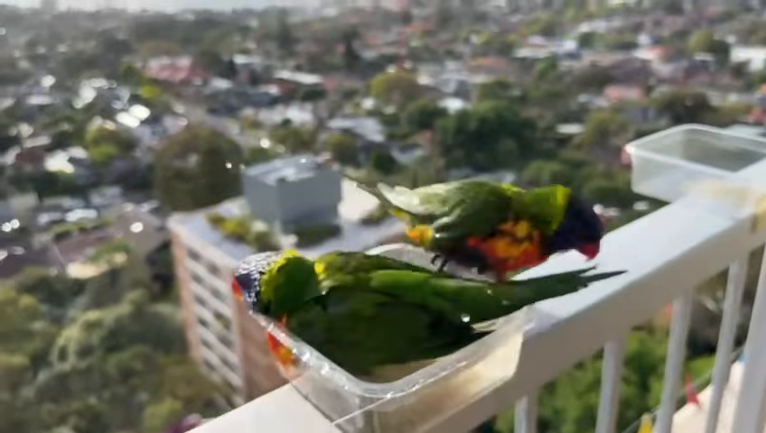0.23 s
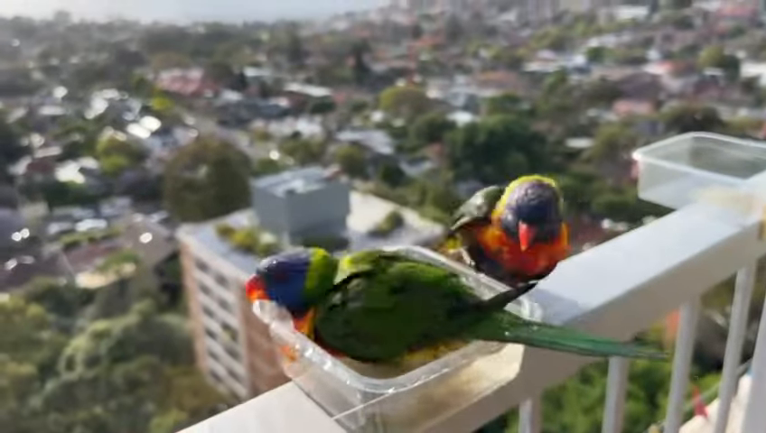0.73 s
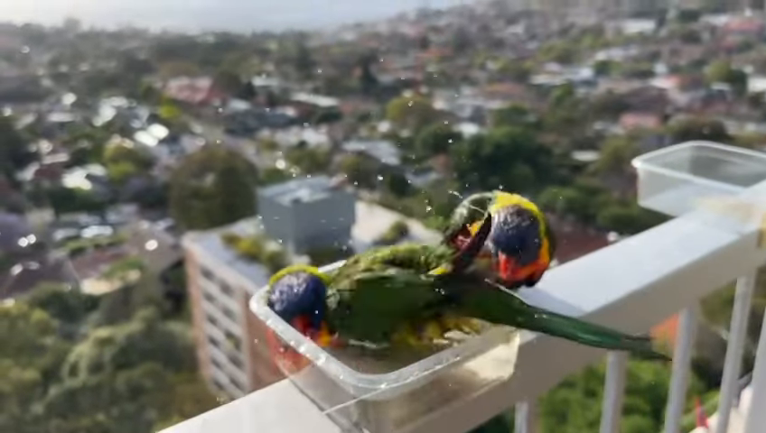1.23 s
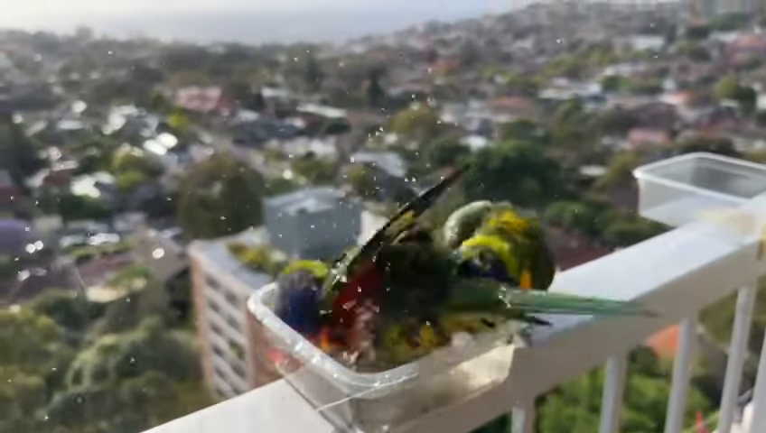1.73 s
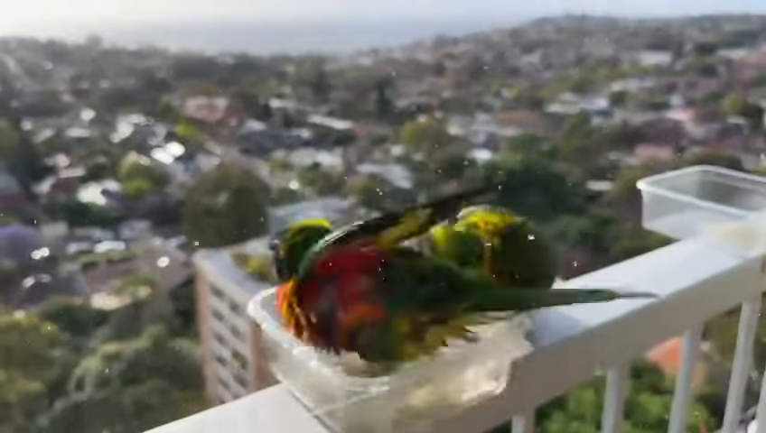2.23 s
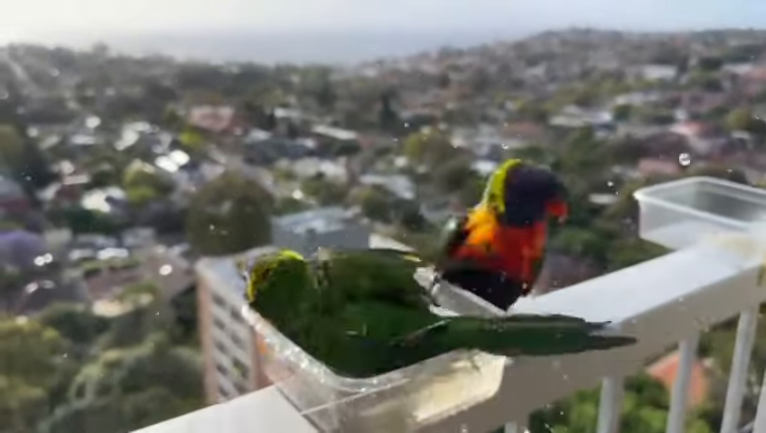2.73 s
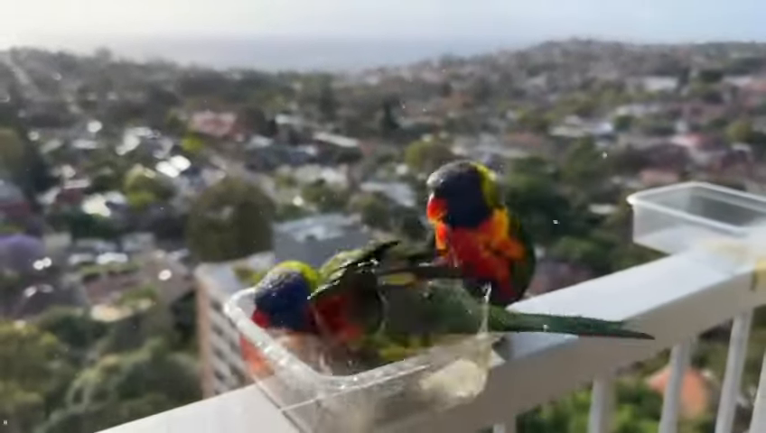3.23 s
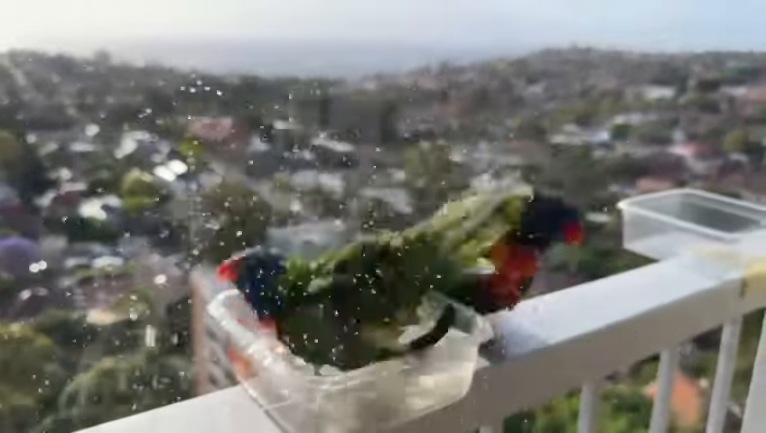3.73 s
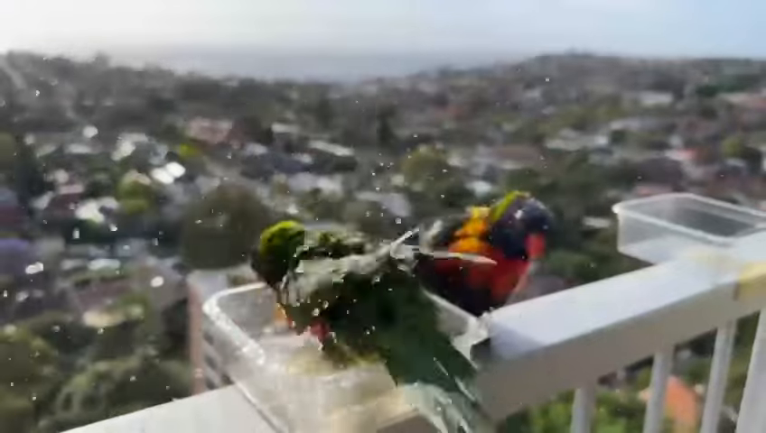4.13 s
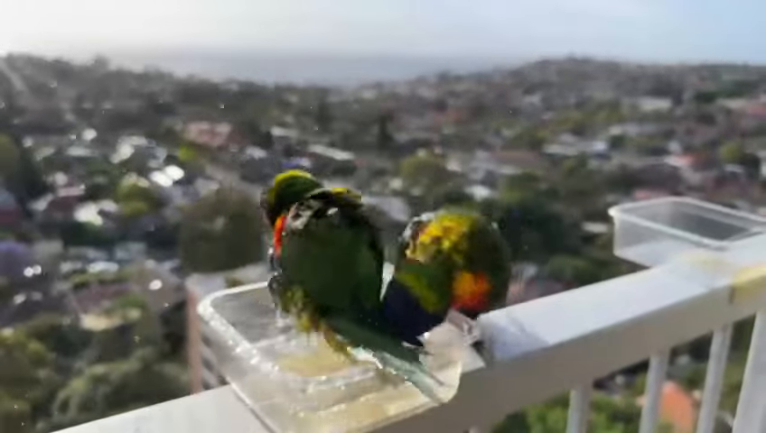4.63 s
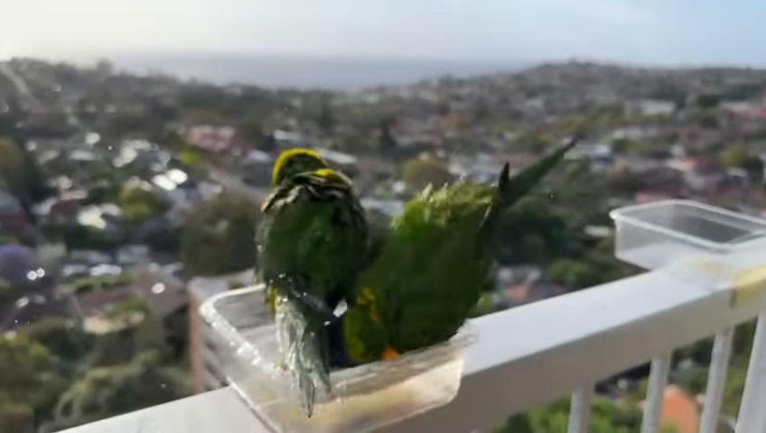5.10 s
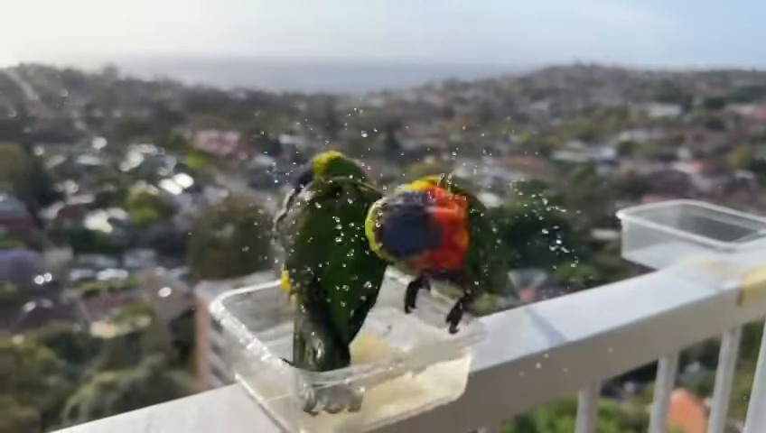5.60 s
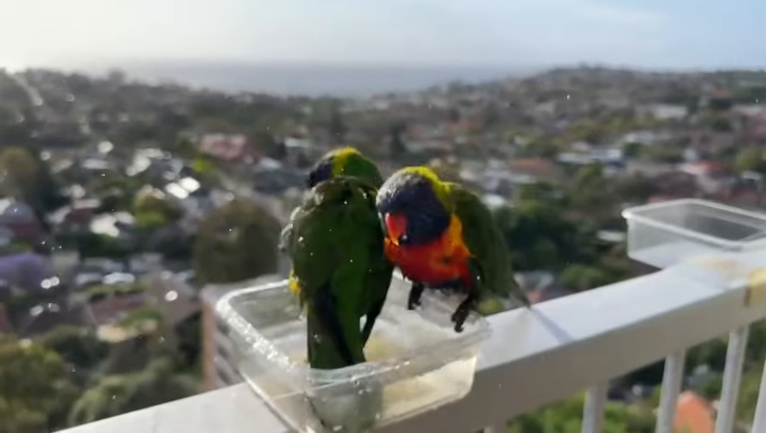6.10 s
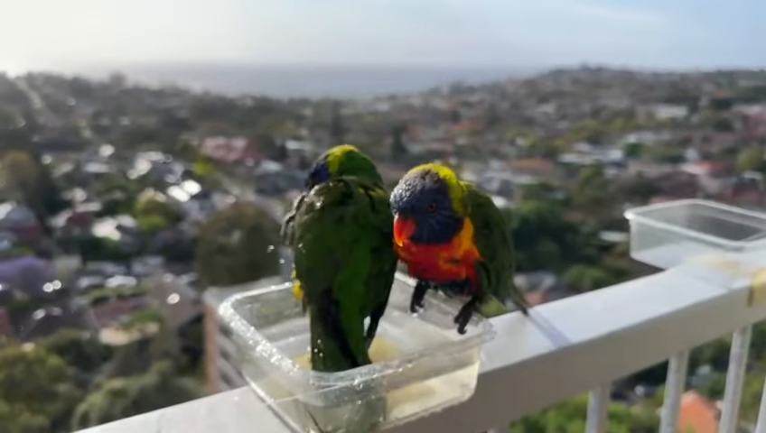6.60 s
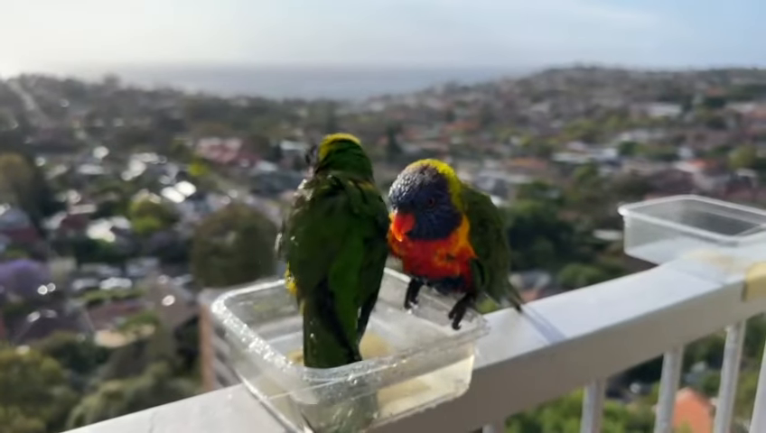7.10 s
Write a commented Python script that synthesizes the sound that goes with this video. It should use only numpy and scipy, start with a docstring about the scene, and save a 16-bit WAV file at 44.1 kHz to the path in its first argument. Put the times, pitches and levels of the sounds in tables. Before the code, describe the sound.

Shrill, raspy parrot squabbling peaks mid-scene amid crackling wet feathers, then quiets to gusty wind before one last sharp burst of calls.

```python
"""A low wavering wind drone and the hum of a town, soon cut by two lorikeets squabbling over a tub of water.
Screeches are runs of short shrill notes, built from harmonics that roughen and throb, with buzzing trills
and dry rasps of filtered puffs. Wet feathers crackle as shaped noise and claws ring the plastic tub's modes.
Gusts of filtered noise buffet a phone near the high balcony rail, which mirrors the calls; a far bird chirps."""
import sys
import numpy as np
from scipy import signal
from scipy.fft import rfft, irfft, next_fast_len
from scipy.io import wavfile

SR = 44100
rng = np.random.default_rng(int(sys.argv[2]) if len(sys.argv) > 2 else 0)


def waveform_to_disk(signal):
    """Save audio, clipped to [-1, 1], as 16-bit WAV at the path in sys.argv[1]."""
    frames = np.transpose(np.atleast_2d(signal))
    scaled = np.clip(frames, -1, 1) * 32767
    samples = np.round(scaled).astype(np.int16)
    wavfile.write(sys.argv[1], SR, samples)


N = 324135
TIME = np.arange(N) / SR


def undb(db):
    """Decibels to gain."""
    return 10 ** (np.asarray(db) / 20)


def unit(x):
    """Scale to rms 1."""
    return x / np.sqrt(np.mean(np.abs(x) ** 2) + 1e-18)


def curve(rows):
    """Join (start_s, value) rows by straight lines."""
    return np.interp(TIME, *np.transpose(rows))


def colour(hz, points):
    """Gain of a (frequency_hz, level_db) spectrum at the given frequencies."""
    point_hz, db = np.transpose(points)
    return undb(np.interp(np.log(hz + 1), np.log(point_hz), db))


def noise(points):
    """Noise with a given spectrum, rms 1."""
    white = rfft(rng.standard_normal(N))
    return unit(irfft(white * colour(np.fft.rfftfreq(N, 1 / SR), points), N))


def wander(size, hz):
    """Smooth random drift, mostly slower than hz, spread about 1."""
    span = size + SR // 10
    soft = np.exp(-(np.fft.rfftfreq(span, 1 / SR) / hz) ** 2)
    return unit(irfft(rfft(rng.standard_normal(span)) * soft, span))[:size]


def band(x, lo_hz, hi_hz, order=2):
    """Band-pass filter."""
    edges_hz = [lo_hz, min(hi_hz, SR / 2 - 1)]
    return signal.sosfilt(signal.butter(order, edges_hz, "band", fs=SR, output="sos"), x)


def spread(mid, side):
    """Left and right from mid and side."""
    return np.array([mid + side, mid - side])


def add(track, start, sound):
    """Mix a sound into a track at a time in seconds."""
    i = max(int(start * SR), 0)
    track[i:i + len(sound)] += sound[:max(N - i, 0)]


def drone():
    """Low drone of the air: one sine, unsteady in pitch and level, that fades out for good."""
    # level before its wavering: start_s, level_db
    drone_levels = [(0, -25.5), (.55, -28), (.8, -23), (1.1, -26), (1.35, -39), (1.7, -23), (2.05, -29.5),
                    (2.45, -38), (2.65, -30.5), (2.88, -45.5), (3.05, -31), (3.6, -35.5), (3.78, -42.5),
                    (4.4, -49), (4.65, -35.5), (4.9, -44)]
    # pitch before its wavering: start_s, pitch_hz
    drone_pitches = [(0, 54.7), (3.1, 54.26), (4.9, 59.2)]
    hz = curve(drone_pitches) * (1 + .06 * wander(N, 8))
    tone = unit(np.sin(2 * np.pi * np.cumsum(hz) / SR))
    fade_out = np.interp(TIME, [4.8, 5.2], [1, 0])
    return tone * undb(curve(drone_levels) + wander(N, 7.1)) * fade_out


def wind():
    """Turbulence on the microphone: low noise that swells in gusts, with smaller, higher eddies."""
    # steady breeze: start_s, level_db
    breeze = [(0, -37.5), (2.5, -39), (4.5, -46), (5.4, -34), (7.35, -40.5)]
    # gusts on top of it: peak_s, rise_db, half_length_s (rise in dB drops to 1/e this far from the peak)
    gusts = [(1.447, 6.5, 0.14), (5.203, 6.5, 0.09), (5.856, 6, 0.057), (6.501, 3, 0.19),
             (7.311, 17, 0.094)]
    # spectrum shape: frequency_hz, level_db (per Hz)
    wind_spectrum = [(25, -17.5), (50, 0.5), (75, 7), (130, -8.5), (250, -12.5), (450, -40.5),
                     (1200, -83.5)]
    swells = sum(db * np.exp(-((TIME - s) / half) ** 2) for s, db, half in gusts)
    gust_db = curve(breeze) + swells + 2 * wander(N, 20)
    rumble = spread(noise(wind_spectrum), .3 * noise(wind_spectrum)) * undb(gust_db)
    # eddies rise more steeply than the gust, so they flutter mainly when it is strong
    eddies = unit(band(rng.standard_normal(N), 90, 170)) * undb(1.475 * gust_db + 9.5)
    return rumble + eddies


def town():
    """The far town: a wide hum of filtered noise that slowly wavers."""
    # spectrum shape: frequency_hz, level_db (per Hz)
    town_spectrum = [(30, -10.5), (100, -9.5), (280, 2), (420, -3.5), (1000, -5), (1600, -15), (3200, -27),
                     (7300, -36.5), (8500, -58)]
    # mid level before its wavering: start_s, level_db
    town_levels = [(0, -41), (2.7, -44.5), (3.7, -48), (7.35, -43.5)]
    hum = spread(noise(town_spectrum), 0.65 * noise(town_spectrum))
    return hum * undb(curve(town_levels) + 1.7 * wander(N, 2.6))


def spray():
    """Wet feathers throw a fine crackle of drops, in steady shaking and in flicks that start with a snap."""
    # steady shaking before its flutter: start_s, level_db
    bathing = [(0, -63.5), (1.4, -58), (2.6, -52), (2.9, -57.5), (3.45, -54.5), (3.95, -59), (4.15, -66),
               (4.9, -61.5), (5.2, -72.5), (6.7, -77.5), (7, -65)]
    # flicks of wet feathers, without the snap: start_s, level_db, decay_s (to 1/e)
    flicks = [(1.795, -42, 0.01), (1.919, -40, 0.0077), (1.961, -46, 0.02), (2.047, -39.5, 0.008),
              (3.865, -45.5, 0.006), (3.934, -47.5, 0.0053), (4.004, -45, 0.006), (4.975, -39, 0.007),
              (5.633, -46, 0.022)]
    strength = undb(curve(bathing) + 3.4 * wander(N, 15))
    for start, db, decay in flicks:
        age = np.maximum(TIME - start, 0)
        snap = 1.4 * np.exp(-age / 0.00039)
        strength = strength + undb(db) * (age > 0) * (np.exp(-age / decay) + snap)
    # spectrum shape: frequency_hz, level_db
    drops = [(700, -9.5), (1600, 9.5), (3000, 8.0), (4600, -1.0), (7000, 1.5), (8800, 2.5), (11000, -21.5)]
    crackle = unit(undb(2.4 * wander(N, 670)))
    return strength * spread(noise(drops), .6 * noise(drops)) * crackle


def syllable(hz, partial_dbs, rough, cycles=1, depth=0):
    """One push of air through the syrinx: an arched note that is roughest where it starts and breaks off."""
    # throat and beak colour of the top partials: frequency_hz, level_db
    throat = [(5000, 3), (8300, 8), (9500, -2), (10500, -0.5), (11500, -14.5), (13000, -49.5)]
    attack_s, release_s = 0.0016, 0.0016
    swell_nepers, fade_nepers = 0.28, 0.22
    scoop_hz = 229  # average size of the fall at either end
    arch_share, arch_s = .17, .018  # arch of the shortest notes, and the length over which it dies away
    break_rough, hiss_level = 0.37, 0.31  # roughness added at the ends; hiss at full roughness
    throb_lag = 2.2  # radians from each partial to the next

    size = len(hz)
    t = np.arange(size) / SR
    left = t[-1] - t
    pressure = (1 - np.exp(-t / attack_s)) * (1 - np.exp(-left / release_s))
    arch = np.sin(np.pi * t / t[-1]) - np.pi / 4

    # the note scoops up at its start and drops away at its end, never twice alike
    opening, closing = np.exp(-t / .002), np.exp(-left / .002)
    scoop, drop = 2 * rng.random(2)
    sag = scoop * opening + drop * closing
    sag = sag - np.average(sag, weights=pressure ** 4)  # keeps the loud part on pitch
    hz = hz * (1 + arch_share * np.exp(-t[-1] / arch_s) * arch) - scoop_hz * sag
    rough = np.clip(rough + break_rough * (opening + closing), 0, 1)

    # the membranes warble and, when pressed hard, jump from cycle to cycle; a throb steadies them
    jitter = .09 * wander(size, 220) + .09 * wander(size, 1100)
    hz = hz * (1 + rough / (1 + depth ** 2) * jitter)

    # every few cycles one is stronger and slower: half tones and side bands
    throb = 2 * np.pi * np.cumsum(hz / cycles) / SR
    phase = 2 * np.pi * (np.cumsum(hz) / SR + rng.random()) - .15 * depth * np.sin(throb)
    partials = [np.sin(k * phase + k * k) * np.exp(depth * np.cos(throb + throb_lag * (k - 1)))
                for k in range(1, 9)]
    top = sum(colour(k * hz, throat) / k ** 2 * partials[k - 1] for k in range(4, 9))

    flutter = 0.51 * rough * wander(size, 400)
    swell = pressure * np.exp(swell_nepers * arch - fade_nepers * t / t[-1] + flutter)
    # pressure counts twice in the overtones, so they open later and close sooner
    overtones = sum(undb(db) * unit(x * swell * pressure)
                    for db, x in zip(partial_dbs, [partials[1], partials[2], top]))
    breath = band(rng.standard_normal(size), 800, 2.4 * hz.mean())
    hiss = unit(breath * (1 + np.cos(phase)) * swell)
    return unit(partials[0] * swell) + overtones + hiss_level * rough * hiss


def throbbing(time):
    """How the voice throbs at a given time: cycles per throb and its depth."""
    # stretches where it throbs: start_s, end_s, cycles_per_throb, depth (nepers)
    throbs = [(.217, .283, 2, 1.3), (2.979, 2.99, 2, 1.2), (3.174, 3.228, 2, .8), (3.317, 3.343, 2, .5),
              (3.549, 3.58, 3, 1.6), (3.58, 3.608, 6, 1.6), (3.608, 3.658, 2, .8)]
    for start, end, cycles, depth in throbs:
        if start <= time < end:
            return cycles, depth
    return 1, 0


def trill(length, first_hz, last_hz, partial_dbs, rate):
    """A run of tiny uneven syllables; fast runs blur into a buzzing rasp."""
    timing_jitter, pitch_scatter, level_scatter_db = 0.08, 0.02, 1.5  # share of a step, share of pitch, dB
    rough = 0.14
    fill, fall_hz = .98, 40  # share of its step a note fills; its fall to either side of the mean

    count = max(round(length * rate), 2)
    chance = rng.standard_normal((count + 1, 3))
    shifts = np.clip(timing_jitter * chance[:, 0], -.35, .35)
    edges = (np.arange(count + 1) + shifts).clip(0) * length / count
    out = np.zeros(int((edges[-1] + .01) * SR))
    for i in range(count):
        along = (i + .5) / count
        hz = np.interp(along, [0, 1], [first_hz, last_hz]) * (1 + pitch_scatter * chance[i, 1])
        size = int((edges[i + 1] - edges[i]) * fill * SR)
        note = syllable(hz + np.linspace(fall_hz, -fall_hz, size), partial_dbs, rough)
        note = note * undb(level_scatter_db * chance[i, 2])
        add(out, edges[i], note * np.sin(np.pi * along) ** 0.27)
    return unit(out)


def rasp(length, tight, mode_dbs, pulse_hz=200, breath=0.19):
    """The syrinx rattles unevenly, and each puff rings the throat."""
    # main, growl, second, third and top resonance, before tightening: frequency_hz, width_hz
    rasp_modes = [(1950, 540), (1130, 380), (3500, 950), (5550, 900), (8450, 1400)]
    size = max(int(length * SR), 64)
    turns = np.cumsum(pulse_hz * (1 + .25 * wander(size, 300))) / SR
    puffs = np.diff(np.floor(turns), prepend=0) + breath * rng.standard_normal(size)
    rise_and_fall = np.abs(np.sin(np.linspace(0, np.pi, size))) ** .9
    puffs = puffs * np.exp(.25 * wander(size, 110)) * rise_and_fall
    puffs = np.pad(puffs, (0, SR // 100))  # room for the ring
    rings = [undb(db) * unit(band(puffs, tight * hz - width / 2, tight * hz + width / 2, order=3))
             for (hz, width), db in zip(rasp_modes, mode_dbs)]
    return sum(rings) * np.sqrt(len(puffs) / size)


def screeches():
    """Both birds' voices: air driven through the syrinx as syllables, trills and rasps."""
    # single notes: start_s, end_s, first_pitch_hz, last_pitch_hz, fundamental_db,
    # second_db, third_db, top_db (partials, re the fundamental), roughness (0-1)
    syllables = [(0.217, 0.282, 1918, 1800, -38.5, -49, -10, -15.5, 0.74),
                 (0.8, 0.825, 2440, 2305, -26, -3, -11, -14.5, 0.11),
                 (0.816, 0.865, 2050, 2100, -32.5, -4.5, -2.5, -16.5, 0.18),
                 (0.865, 0.89, 2270, 2310, -30.5, -3, -10, -17, 0.09),
                 (0.887, 0.914, 1994, 1950, -29.5, -9.5, 0, -18, 0.15),
                 (0.912, 0.945, 2277, 2273, -31, -4.5, -17, -16, 0.11),
                 (1.435, 1.457, 2090, 2170, -35.5, -6.5, -14, -11, 0.12),
                 (1.453, 1.484, 1855, 1765, -36.0, -10, -17, -29, 0.22),
                 (1.5, 1.539, 2008, 1856, -29.0, -11.5, -10, -16, 0.097),
                 (1.683, 1.708, 1948, 2053, -25, -16.5, -14.5, -21, 0.45),
                 (2.161, 2.22, 1007, 1098, -31, -3, -8, -8.5, 0.55),
                 (2.181, 2.213, 963, 1175, -26, -10, -8.5, -16, 0.28),
                 (2.674, 2.742, 2030, 1865, -35, -12.5, -10.5, -14.5, 0.2),
                 (2.919, 2.941, 2534, 2715, -21.5, -7.5, -8, -12.5, 0.14),
                 (2.935, 2.949, 2460, 2660, -21.5, -0.5, -6.5, -2, 0.54),
                 (2.943, 2.984, 2540, 2546, -20.5, -1.5, -8, -4, 0.07),
                 (2.981, 2.986, 2510, 2730, -24, -1, -1, -9, 0.7),
                 (2.984, 3.004, 2760, 3080, -20.5, -4, 0, -14.5, 0.1),
                 (3.003, 3.041, 2540, 2704, -20, -1.5, -6, -5, 0.29),
                 (3.032, 3.075, 2854, 3010, -17.5, -5, 0.5, -18, 0.013),
                 (3.069, 3.082, 750, 1800, -36.5, -7.5, -13, -12.5, 0.6),
                 (3.078, 3.105, 2600, 2810, -22.5, 1, -12.5, -24.5, 0.1),
                 (3.101, 3.131, 2386, 2373, -19.5, -7.5, -2.5, -12.5, 0.098),
                 (3.128, 3.172, 2617, 2593, -16, -7, -17, -17.5, 0.12),
                 (3.173, 3.229, 2684, 2598, -17, -10, -5, -17.5, 0.16),
                 (3.226, 3.244, 2960, 3030, -22.5, -1, -1.5, -27, 0.18),
                 (3.24, 3.278, 2672, 2640, -20.5, -8, -1, -8.5, 0),
                 (3.271, 3.292, 2880, 2760, -15, -11.5, -7.0, -26, 0.062),
                 (3.286, 3.312, 2467, 2420, -21, -6, -4.5, -16.5, 0.11),
                 (3.316, 3.345, 2826, 2613, -22, -12, -6.5, -27.5, 0.22),
                 (3.34, 3.379, 2617, 2794, -22, -11, -6, -17.5, 0.033),
                 (3.55, 3.6, 2447, 2777, -24.5, -16.5, -22.5, -29.5, 0.33),
                 (3.58, 3.618, 2700, 2590, -22, -11, -16, -33.5, 0.56),
                 (3.609, 3.62, 3015, 3120, -18.5, -6.5, -16.5, -30, 0.16),
                 (3.615, 3.656, 2636, 2756, -14.5, -11.5, -21.5, -33, 0.22),
                 (3.656, 3.68, 3770, 3756, -12.5, -20, -47, -44.5, 0),
                 (3.689, 3.704, 2420, 2480, -24.5, -8, -16, -42, 0.17),
                 (3.7, 3.726, 3560, 3590, -18.5, -9.5, -38.5, -45, 0.079),
                 (4.25, 4.292, 1837, 1810, -35, -6.5, -8.5, -23, 0.071),
                 (4.293, 4.323, 3535, 3120, -31, -19, -17, -54, 0.071),
                 (4.329, 4.369, 1887, 2030, -29.5, -7.5, -8.5, -29, 0.22),
                 (4.376, 4.392, 2050, 1877, -32.5, -7.5, -9.5, -31, 0.22),
                 (4.494, 4.511, 820, 1270, -37.5, -1, -13, -13, 0.82),
                 (4.508, 4.528, 2320, 2743, -23, -10.5, -17.5, -15.5, 0.088),
                 (4.52, 4.571, 2230, 1947, -26.5, -27, -21, -14.5, 0.36),
                 (4.569, 4.584, 2207, 2306, -21.5, -30, -23, -34, 0.13),
                 (4.588, 4.598, 1976, 1930, -25, -24, -24, -30, 0.28),
                 (4.606, 4.635, 1915, 1786, -28.5, -20.5, -27, -28, 0.064),
                 (7.204, 7.23, 2187, 2324, -27, -17, -4.5, -22, 0),
                 (7.237, 7.264, 2646, 2425, -18.5, -16.5, -13, -20, 0.035),
                 (7.26, 7.32, 2442, 2448, -20, -11, -11, -32, 0.049),
                 (7.317, 7.355, 2370, 2155, -18.5, -10.5, -10, -16, 0.076)]
    # runs of notes: start_s, end_s, first_pitch_hz, last_pitch_hz, level_db (whole run),
    # second_db, third_db, top_db (partials, re the fundamental), rate (syllables per s)
    trills = [(0.16, 0.212, 1845, 1740, -45, -23, -10, -30, 110),
              (0.381, 0.492, 1820, 1880, -39, -3.5, -13.5, -9.5, 190),
              (0.488, 0.534, 2160, 2200, -39, -9, -19, -17, 240),
              (0.939, 0.996, 1830, 1520, -36.5, -19.5, -16, -24, 140),
              (1.54, 1.597, 1983, 1875, -31, -11.5, -14.5, -14, 55),
              (1.591, 1.687, 1814, 1866, -34, -14.5, -19, -19.5, 68),
              (2.092, 2.167, 2050, 1950, -40, -11.5, -22, -22, 220),
              (2.229, 2.328, 1880, 1890, -33, -15, -10, -32, 190),
              (2.741, 2.817, 2150, 1563, -40, -12, -10.5, -17, 70),
              (2.817, 2.876, 1850, 1598, -35.5, -19, -15, -25, 95),
              (4.632, 4.72, 1825, 1750, -35, -24, -20, -27.5, 180)]
    # rattles: start_s, end_s, tightness (factor on the throat's resonances), main_db,
    # growl_db, second_db, third_db, top_db (resonances, re the main one)
    rasps = [(0.787, 0.804, 0.96, -44.5, 0, -7, -10, -23),
             (1.69, 1.736, 1.02, -26.5, -6.5, -15.5, -19.5, -14.5),
             (2.328, 2.412, 1.032, -33.5, -6.5, -9.5, -8, -6.5),
             (2.906, 2.921, 1.08, -43, 2, -3.5, -3, -17.5)]
    out = np.zeros(N)
    for start, end, first_hz, last_hz, db, *partial_dbs, rough in syllables:
        hz = np.linspace(first_hz, last_hz, max(int((end - start) * SR), 64))
        cycles, depth = throbbing((start + end) / 2)
        add(out, start, undb(db) * syllable(hz, partial_dbs, rough, cycles, depth))
    for start, end, first_hz, last_hz, db, *partial_dbs, rate in trills:
        add(out, start, undb(db) * trill(end - start, first_hz, last_hz, partial_dbs, rate))
    for start, end, tight, db, *mode_dbs in rasps:
        add(out, start, undb(db) * rasp(end - start, tight, [0, *mode_dbs]))
    return band(out, 430, 10800, order=3)


def ports(x, even_hz=5600):
    """Two microphone ports hear a near source with different phase and, below the treble, different level."""
    # where the caller sits: start_s, left_minus_right_db
    place = [(0.4, -3), (.81, -7.5), (.9, -7), (2.75, 5.5), (2.93, -7), (3.12, -4.5), (3.3, -7),
             (3.6, -5.5), (4.3, -3.5), (4.55, 0.5), (7.3, 6.5)]
    # phase by which the left port leads: frequency_hz, lead_rad
    port_phase = [(2500, -.2), (3700, .5), (4200, 1.2), (6500, 1.7), (8000, 5.8), (9500, 5.2), (10500, 3.4)]
    size = next_fast_len(N + SR)
    hz, spectrum = np.fft.rfftfreq(size, 1 / SR), rfft(x, size)
    lead = np.interp(hz, *np.transpose(port_phase))
    shaded = 1 / (1 + (hz / even_hz) ** 6)  # share of each frequency that is panned
    ratio = undb(curve(place))
    gains = np.array([ratio, np.ones(N)]) / np.sqrt((1 + ratio ** 2) / 2)
    out = []
    for gain, heard in zip(gains, (spectrum, spectrum * np.exp(-1j * lead))):
        panned = gain * irfft(heard * shaded, size)[:N]
        out.append(panned + irfft(heard * (1 - shaded), size)[:N])
    return np.array(out)


def rail(x):
    """The narrow rail mirrors the treble to each port; as the birds bob, notches sweep through it."""
    lag_s, swing, mirror_db = 0.001, 0.27, -9  # swing: share of the lag
    out = []
    for heard in x:
        lag = lag_s * (1 + swing * wander(N, 7.0))
        mirrored = np.interp(TIME - lag, TIME, band(heard, 6500, 12000))
        out.append(heard + undb(mirror_db) * mirrored)
    return np.array(out)


def balcony(x):
    """A wall throws back one echo, and the facade a short dull tail, different on each side."""
    t = np.arange(SR // 2) / SR
    out = []
    for _ in range(2):
        decay = undb(-60 * t / 0.17)
        tail = unit(band(rng.standard_normal(len(t)), 520, 6300, order=1) * decay)
        tail = tail * undb(-11.5) / np.sqrt(len(t))
        tail[int(.057 * SR)] += undb(-32.5)  # the wall's echo
        out.append(signal.fftconvolve(x, tail)[:N])
    return np.array(out)


def knocks():
    """A claw strikes the tub and rebounds; the water damps its ring."""
    # strikes: start_s, level_db (relative)
    strikes = [(4.338, -23), (4.8796, -28.5), (5.041, -23)]
    # modes of the tub: frequency_hz (before each strike's slight detuning), level_db (relative), t60_s
    tub = [(359, 4, 0.023), (1080, 4, 0.025), (1387, 15.5, 0.014), (1827, 7.5, 0.02), (2795, 3, 0.016),
           (4560, -3, 0.0062)]
    out, t = np.zeros(N), np.arange(SR // 10) / SR
    for start, db in strikes:
        ring = 0
        for hz, mode_db, t60 in tub:
            struck_hz = hz * (1 + 0.022 * rng.standard_normal())
            ring = ring + undb(mode_db - 60 * t / t60) * np.sin(2 * np.pi * struck_hz * t)
        click = band(rng.standard_normal(len(t)), 500, 7450) * np.exp(-t / 0.0014)
        blow = undb(db) * (0.21 * ring + 0.62 * click)
        add(out, start, blow)
        add(out, start + 0.00255, 0.72 * blow)  # the rebound
    return out


def far_chirps():
    """A bird far off answers; only the fundamental carries, as gliding sines."""
    # chirps: start_s, end_s, first_pitch_hz, last_pitch_hz, level_db
    chirps = [(6.446, 6.504, 2820, 2546, -56), (6.836, 6.864, 2990, 2880, -56.5),
              (7.168, 7.193, 2980, 2860, -54)]
    out = np.zeros(N)
    for start, end, first_hz, last_hz, db in chirps:
        hz = np.linspace(first_hz, last_hz, int((end - start) * SR))
        tone = np.sin(2 * np.pi * np.cumsum(hz) / SR)
        add(out, start, undb(db) * unit(tone * np.hanning(len(hz))))
    return out


def scene():
    """Birds, water and tub near by, in open air."""
    around = drone() + wind() + town() + spray() + far_chirps()
    near = screeches() + knocks()
    return rail(ports(near)) + balcony(near) + around


def record(dry):
    """The phone drops the deepest bass, rounds the highest peaks and cuts the top."""
    top_hz = 11800
    dry = signal.sosfilt(signal.butter(2, 22, "high", fs=SR, output="sos"), dry)
    dry = dry / (1 + (dry / .85) ** 8) ** .125
    return signal.sosfilt(signal.ellip(8, .2, 70, top_hz, fs=SR, output="sos"), dry)


dry = scene()
out = record(dry)
waveform_to_disk(out)
```